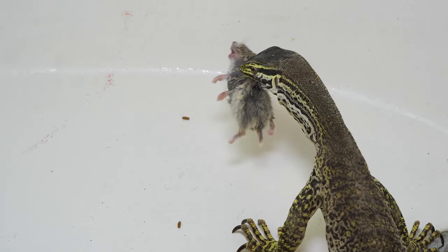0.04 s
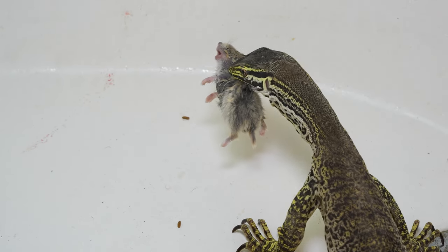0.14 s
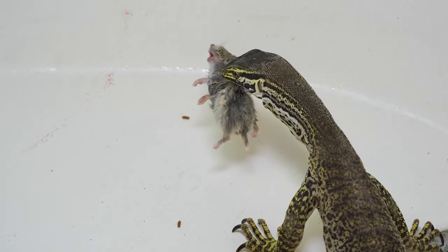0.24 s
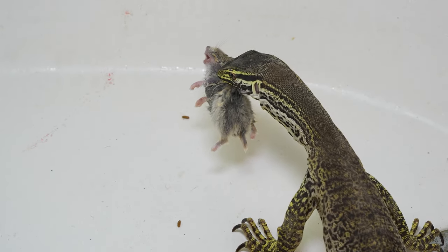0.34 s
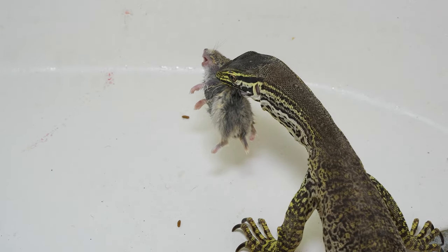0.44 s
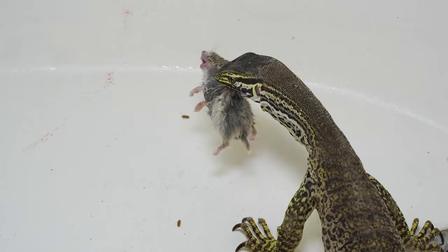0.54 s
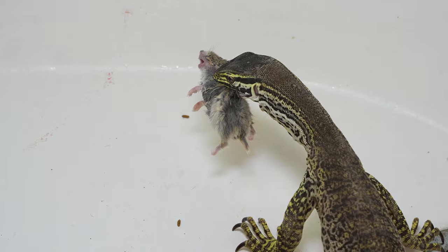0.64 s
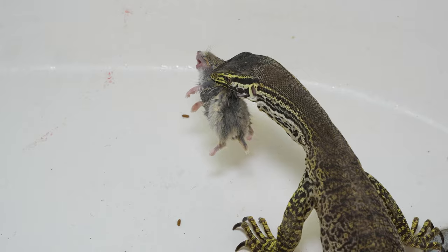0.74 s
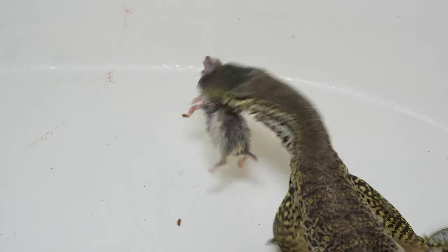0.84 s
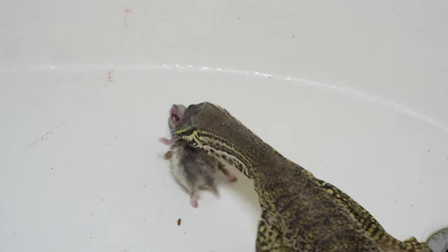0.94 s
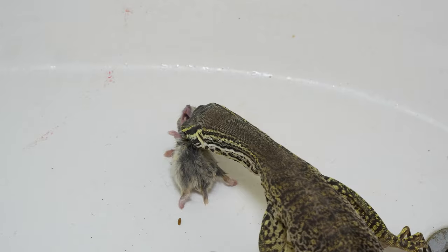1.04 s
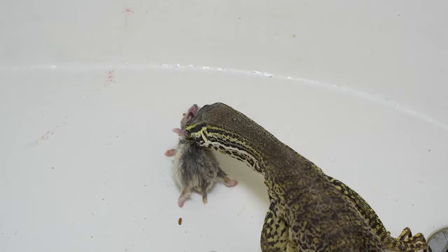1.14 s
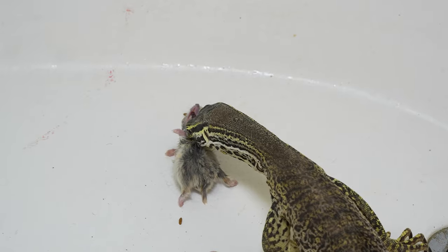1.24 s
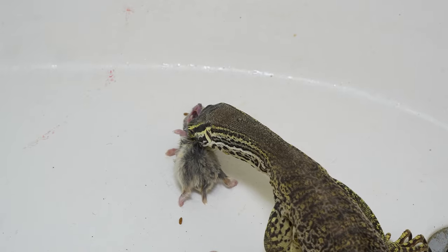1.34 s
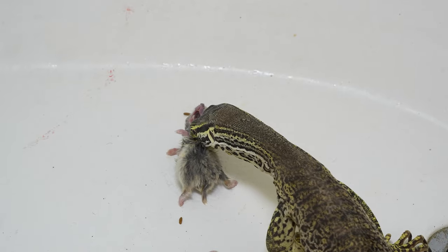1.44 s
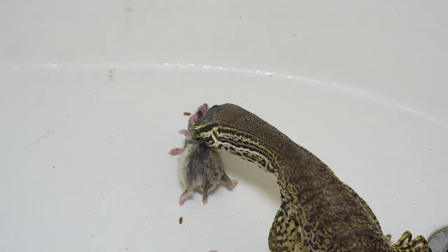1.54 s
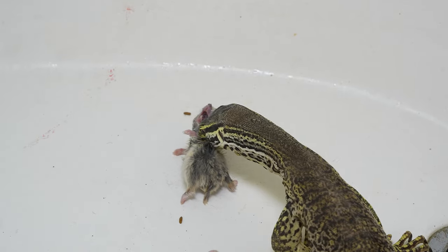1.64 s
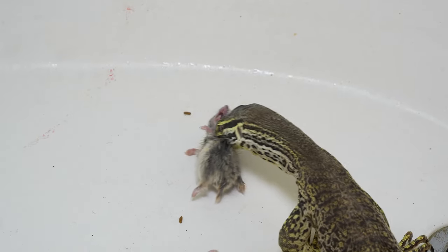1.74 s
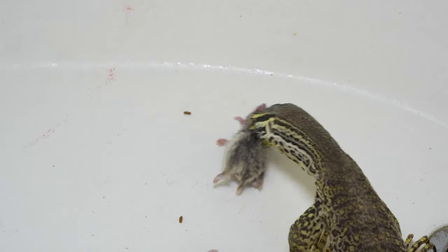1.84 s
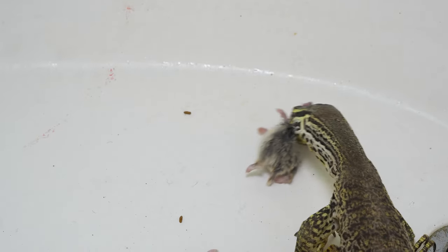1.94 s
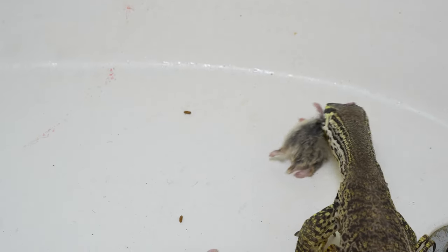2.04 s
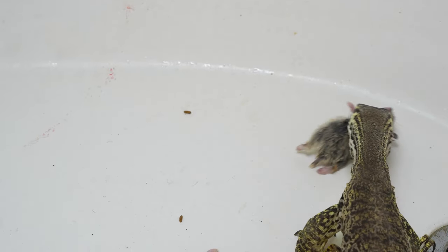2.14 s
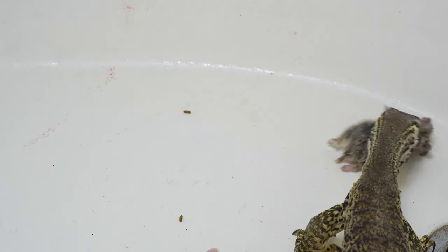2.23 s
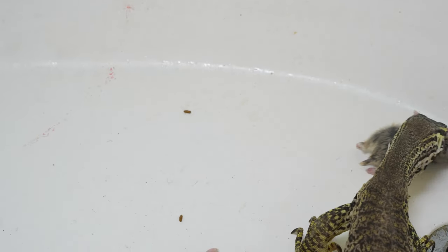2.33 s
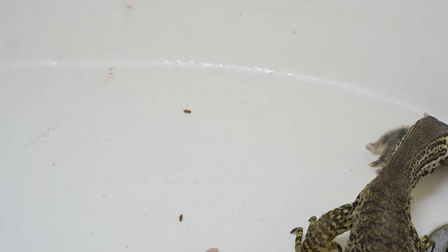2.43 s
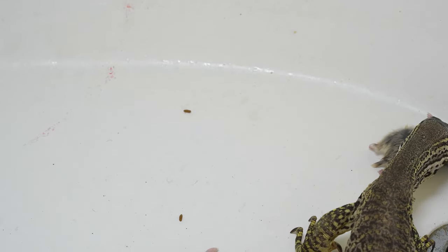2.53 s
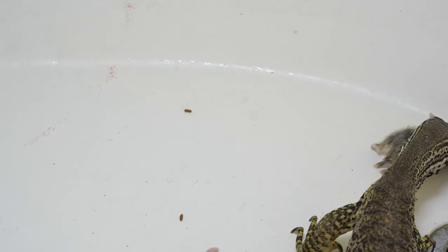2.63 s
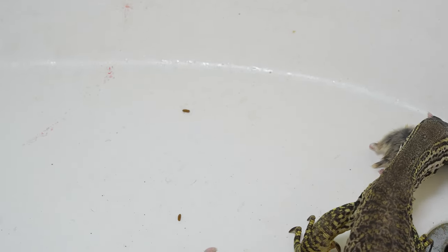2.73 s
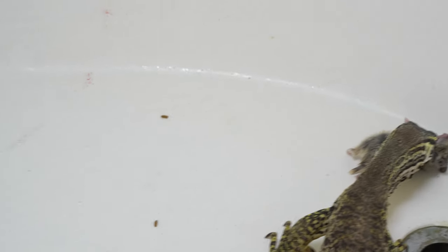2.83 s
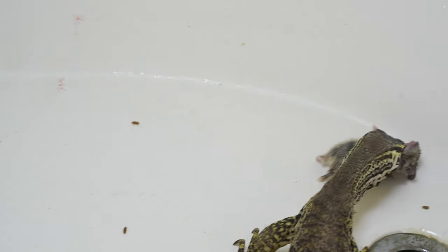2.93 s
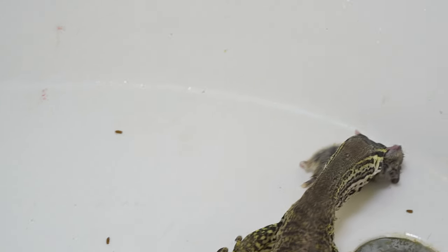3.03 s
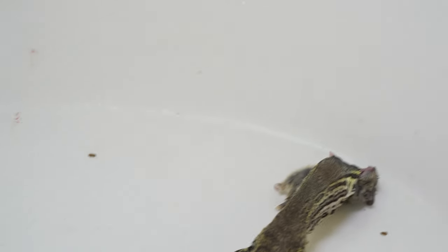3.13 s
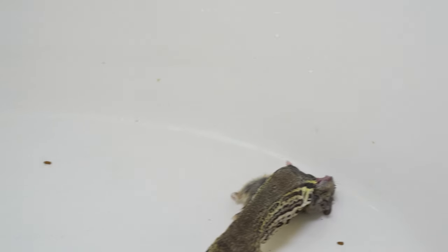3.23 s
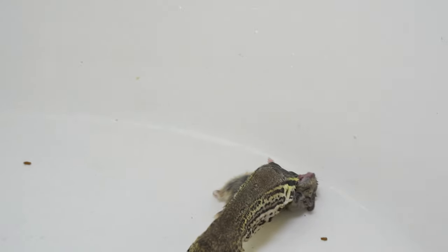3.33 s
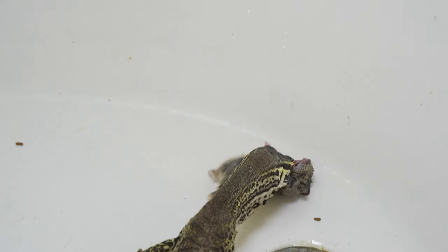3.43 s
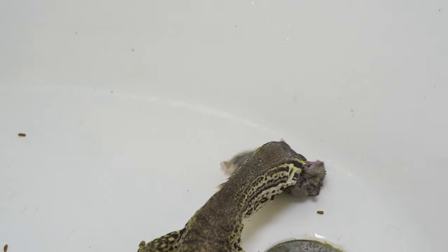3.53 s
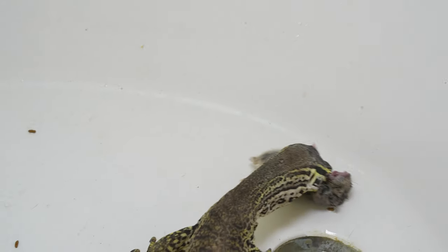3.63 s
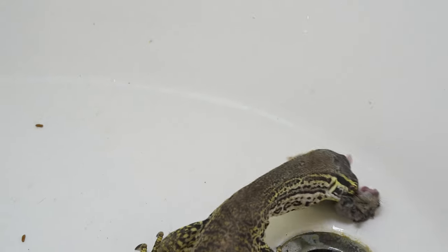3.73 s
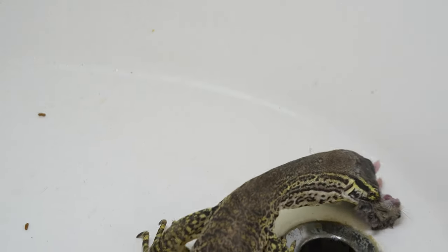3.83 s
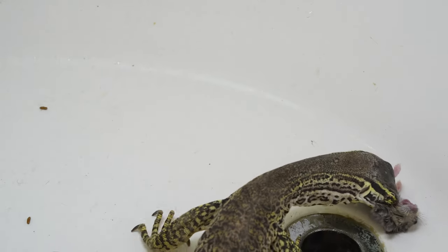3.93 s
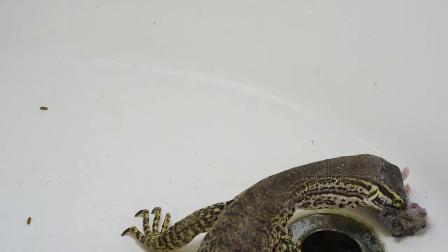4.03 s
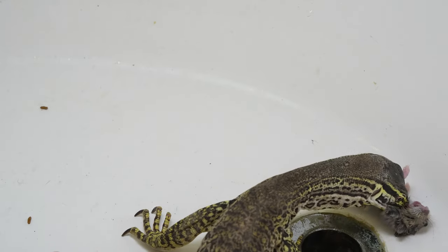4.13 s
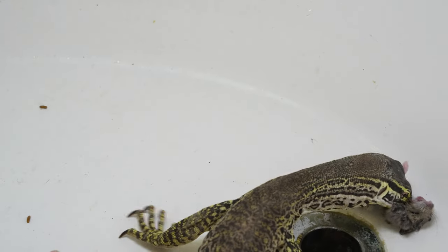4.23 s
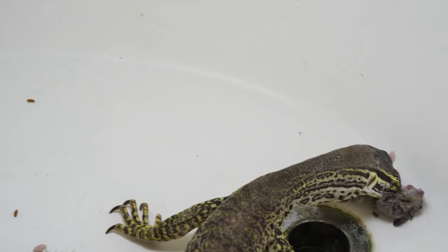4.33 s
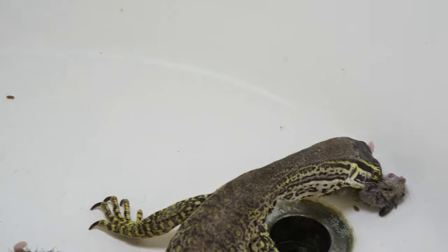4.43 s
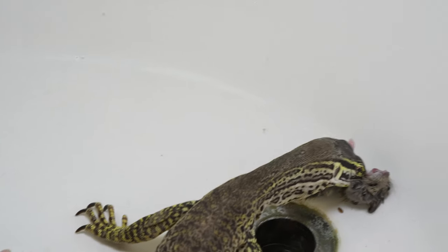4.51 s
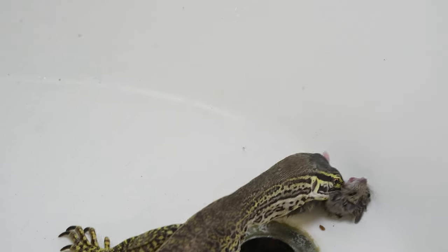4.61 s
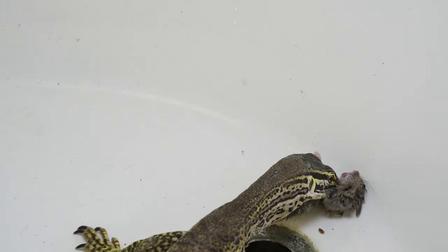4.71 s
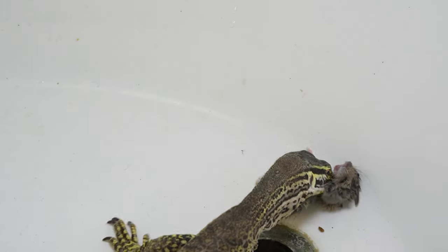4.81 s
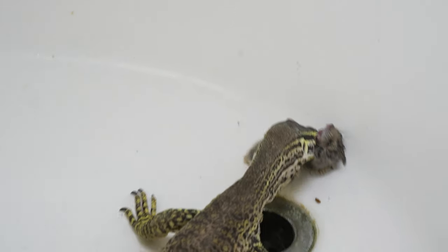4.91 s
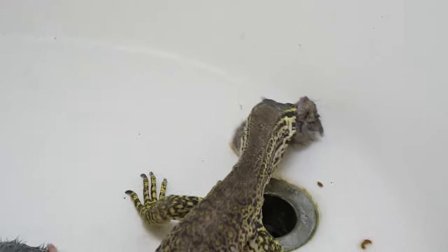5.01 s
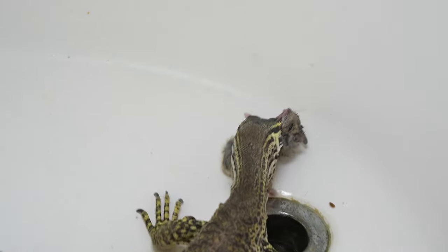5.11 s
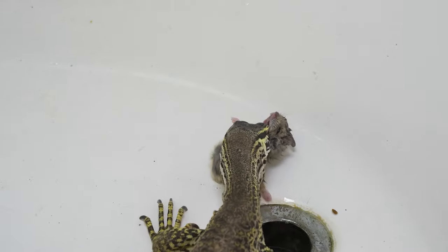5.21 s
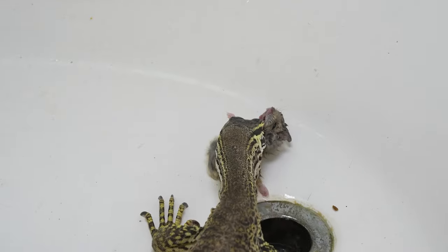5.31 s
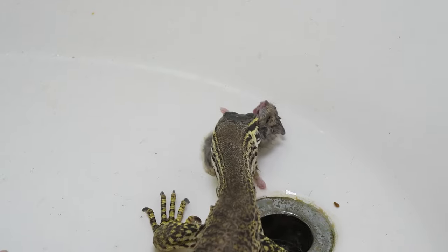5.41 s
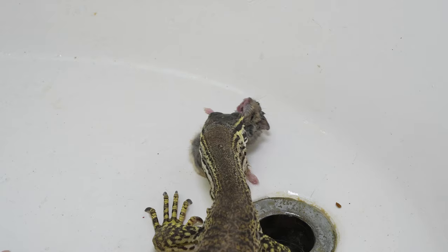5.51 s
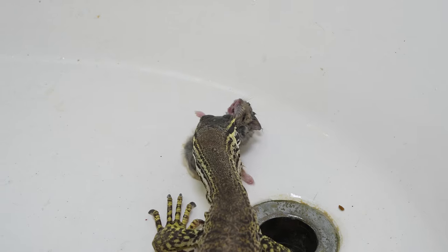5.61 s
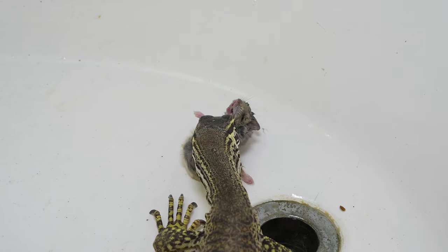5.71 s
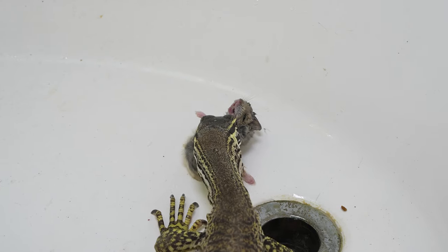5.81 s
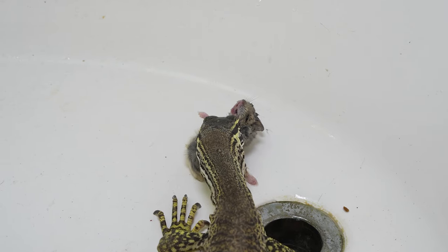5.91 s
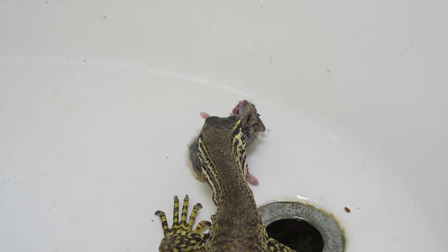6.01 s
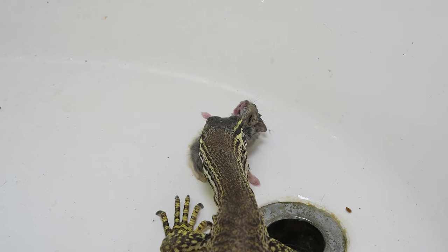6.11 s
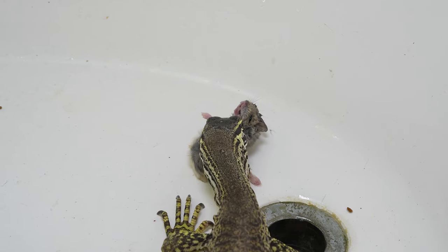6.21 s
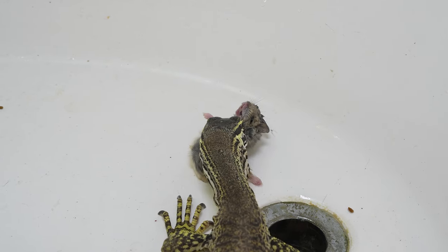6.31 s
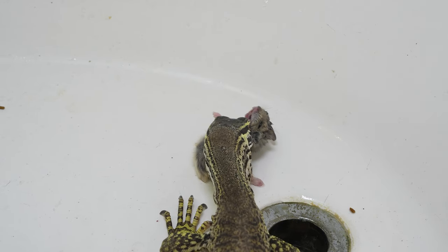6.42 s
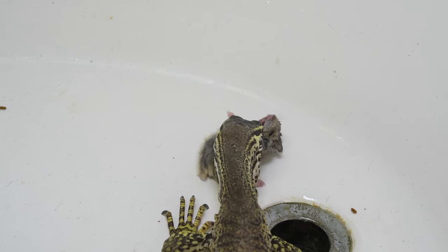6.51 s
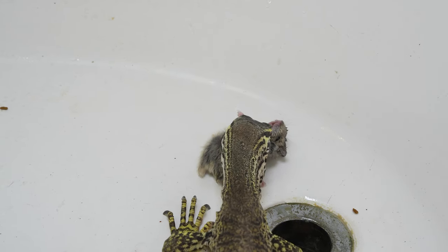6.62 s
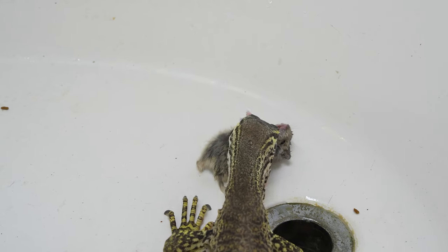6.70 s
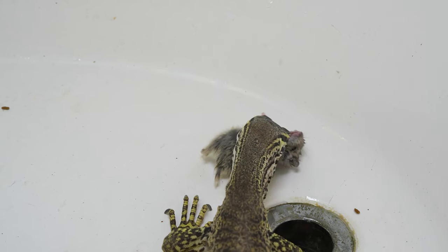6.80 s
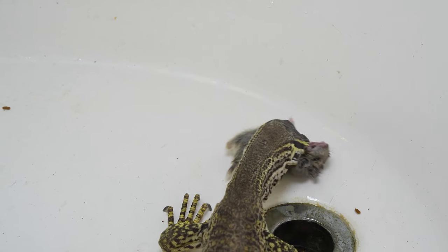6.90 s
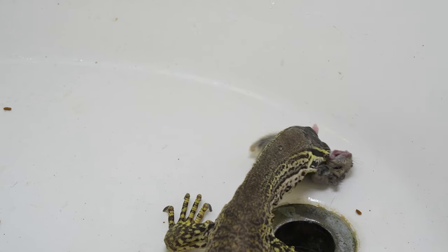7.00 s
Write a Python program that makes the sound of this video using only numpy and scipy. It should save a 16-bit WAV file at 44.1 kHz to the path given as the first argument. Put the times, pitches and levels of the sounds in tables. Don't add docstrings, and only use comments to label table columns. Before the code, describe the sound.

A big lizard's claws tick and scales scrape in an enamel tub, then a heavy booming thump and metallic drain-ring chinks in a small tiled room.

```python
import sys
import numpy as np
from scipy import signal
from scipy.fft import rfft, irfft, next_fast_len
from scipy.io import wavfile
from scipy.ndimage import uniform_filter1d, map_coordinates

SR = 44100
rng = np.random.default_rng(int(sys.argv[2]) if len(sys.argv) > 2 else 0)


def store_pcm(level_fs):
    pcm = np.round(np.clip(level_fs, -1, 1) * 32767).astype(np.int16)
    wavfile.write(sys.argv[1], SR, np.atleast_2d(pcm).T)


def volts_from_decibels(level):
    exponent = np.asarray(level, float) / 20
    return 10 ** exponent


N = 311065


def unit(x):
    return x / np.sqrt(np.mean(x ** 2) + 1e-20)


def along(points, hz):
    f, v = np.transpose(points)
    return np.interp(np.log(hz + 1), np.log(f + 1), v)


def filtered(x, response):
    m = next_fast_len(len(x) + 4096)
    return irfft(rfft(x, m) * response(np.fft.rfftfreq(m, 1 / SR)), m)[:len(x)]


def resonant(x, peaks):
    def response(f):
        total = 0
        for k, (centre, width, db) in enumerate(peaks):
            damping = 1j * f * width
            total = total + (-1) ** k * volts_from_decibels(db) * damping / (centre * centre - f * f + damping)
        return total
    return filtered(x, response)


def coloured(x, spectrum):
    return unit(filtered(x, lambda hz: volts_from_decibels(along(spectrum, hz))))


def wobble(rate):
    knots = rng.standard_normal(int(N * rate / SR) + 4)
    return map_coordinates(knots, [np.arange(N) * rate / SR])


def add(out, s, x):
    part = out[round(s * SR):][:len(x)]
    part += x[:len(part)]


def strike(size):
    return 1. * (np.arange(size) == 0)


def sine(hz, t):
    return np.sin(2 * np.pi * hz * t)


def grit(spread_db):
    return rng.standard_normal(N) * volts_from_decibels(spread_db * wobble(600) + .9 * wobble(40))


def strokes(rows, fade):
    s, rise, hold, db = np.transpose(rows)[..., None]
    grid = np.arange(0, N / SR + .001, .001)
    build_db = 30 * np.minimum(grid - s, 0) / abs(rise)
    fade_db = fade * np.maximum(grid - s - abs(hold), 0)
    gain = volts_from_decibels(db + build_db - fade_db)
    return np.interp(np.arange(N) / SR, grid, gain.sum(axis=0))


# (frequency [Hz], t60 [s])
TILE_DECAY = [(200, 0.59), (1500, 0.58), (5000, 0.53), (10000, 0.43), (13000, 0.31), (16000, 0.44)]


def roomy(x, wet_db, rattle_db=-60, t60=.01):
    hz, t, z = signal.stft(rng.standard_normal(SR // 2), SR, nperseg=256)
    decay = volts_from_decibels(-60 * t / along(TILE_DECAY, hz)[:, None])
    tail = signal.istft(z * decay, SR, nperseg=256)[1]
    t = np.arange(len(tail)) / SR
    tail *= 1 - np.exp(-t / 0.00029)
    echoes = volts_from_decibels(rattle_db - 60 * t / t60) * rng.standard_normal(len(t))
    echoes[0] = 1
    return signal.fftconvolve(x, echoes + volts_from_decibels(wet_db) * tail / np.linalg.norm(tail))


# (frequency [Hz], density [dB per Hz])
TONE_SPECTRUM = [(12, -64), (20, -6.5), (65, -6), (116, -5.5), (150, -4.5), (319, -4.5), (446, -9),
                 (485, -5), (527, -10), (698, -12), (1530, -20), (1710, -19.5), (2320, -21.5), (16000, -30)]


def room_tone():
    return volts_from_decibels(-67 + .3 * wobble(3)) * coloured(rng.standard_normal(N), TONE_SPECTRUM)


# (time [s], peak level [dB], pitch [Hz])
NIPS = [(0.0262, -64, 4600), (0.046, -58, 1150), (.0466, -60, 4300), (.0495, -61, 3000), (.027, -67, 6200),
        (0.0314, -66, 3100), (0.8003, -59, 3800), (1.634, -66, 4180), (1.6345, -61, 6800),
        (1.7402, -63, 8100), (1.9413, -47, 7860), (4.2298, -44, 4300), (4.236, -47, 4000),
        (4.8255, -50, 3950), (4.9025, -41, 4400), (1.0445, -41.5, 5030), (2.247, -65, 990),
        (4.572, -41, 4900), (4.587, -42, 3600), (4.601, -42, 4700), (4.616, -41, 3300), (4.893, -49, 3700),
        (4.9009, -43, 2520), (5.7905, -61.5, 3750), (5.8444, -67, 3700), (5.9444, -69, 3770),
        (5.9994, -67.5, 3600), (6.359, -62.5, 3740), (6.444, -66, 3900), (6.4748, -62, 3700),
        (6.7152, -52.5, 4100), (6.816, -59.5, 3300)]


def nips():
    out = np.zeros(N)
    for s, db, hz in NIPS:
        band = [(hz, .26 * hz, 0)]
        tick = resonant(resonant(strike(size=1024), band), band)
        tick = volts_from_decibels(db + 1.5) * tick / np.abs(tick).max()
        add(out, s, roomy(tick, wet_db=-4, rattle_db=-24, t60=.012))
    return out


# (full force [s], rise [s], hold [s], level [dB], sharp edge re scrape [dB])
SKIDS = [(0.035, 0.1, .01, -77, -16), (0.84, 0.014, .01, -58, -13), (0.844, 0.035, 0.012, -52, 0),
         (0.924, 0.0048, 0.018, -56, -0.5), (0.97, 0.11, 0.028, -57, -21), (1.74, 0.6, 0.25, -74, -4.5),
         (2.093, .05, 0.016, -83, 3), (2.196, 0.22, 0.14, -81.5, 0.5), (4.246, 0.029, .005, -48.5, -42),
         (4.823, 0.29, 0.057, -61, -8), (4.908, 0.047, .01, -51.5, -22), (6.822, 0.33, 0.063, -77.5, -1.5)]
# (full force [s], rise [s], hold [s], level [dB], sharp edge re scrape [dB])
SLIDES = [(2.772, 0.065, 0.0094, -61.5, -25.5), (2.96, 0.15, 0.16, -77, -11), (3.2, 0.83, 0.21, -69, -6.5),
          (3.52, 0.17, 0.051, -77, -16), (4.39, 0.27, 0.087, -65.5, -13), (4.6, 0.17, 0.018, -54, -28),
          (4.98, 0.061, 0.016, -57, -22), (5.14, 0.52, 0.096, -70, -11), (5.4, 0.23, 0.26, -73.5, -9.5),
          (5.786, 0.037, .005, -80, -17), (6.5, 0.56, .2, -82.5, -14), (6.95, 0.22, 0.089, -83.5, 3)]
# (full force [s], rise [s], hold [s], level [dB], sharp edge re scrape [dB])
CROSSINGS = [
    (3.68, 0.066, 0.0038, -63, -21),
    (3.73, 0.04, .04, -80, -43),
    (4.573, 0.075, 0.027, -51, -12.5),
]
PIPE_SHARES = (-55, -22, -7)
# (full load [s], rise [s], hold [s], shell level [dB], deep sway level [dB])
LEANS = [(0.045, 0.024, 0.0077, -66, -85), (0.142, .02, .005, -73, -75), (0.826, 0.04, 0.017, -60, -74),
         (0.874, 0.1, 0.031, -49.5, -62), (0.923, 0.004, 0.012, -47.5, -50.5),
         (1.0, 0.082, 0.065, -62, -75), (1.723, 0.055, 0.071, -67, -75), (1.896, 0.077, 0.012, -55, -65),
         (2.254, 0.03, 0.0089, -65.5, -89), (2.63, 0.35, .02, -80, -66), (2.778, 0.13, 0.0045, -60.5, -56),
         (3.1, 0.083, .01, -87, -64), (3.35, 0.37, 0.029, -82, -71.5), (3.487, 0.27, 0.1, -65.5, -91.5),
         (3.704, 0.16, 0.072, -59.5, -73), (3.996, 0.12, 0.056, -57, -70),
         (4.249, 0.036, 0.0069, -51.5, -52), (4.342, 0.14, 0.13, -63.5, -56),
         (4.548, 0.075, 0.033, -77, -55), (4.6, 0.13, 0.016, -44, -38), (4.9, 0.14, 0.11, -57.5, -47),
         (5.1, 0.41, 0.14, -67, -67.5), (5.39, 0.13, 0.11, -68.5, -72.5), (4.66, .05, 0.0093, -57.5, -62),
         (5.821, 0.23, 0.065, -65.5, -75), (6.886, 0.55, 0.069, -68, -75)]
# (centre [Hz], width [Hz], level [dB])
PIPE = [(1655, 550, 3.5), (2530, 45, -1), (3000, 790, 0.5), (3950, 550, 0), (4800, 1100, -3.5)]
# (frequency [Hz], density [dB per Hz])
SCRAPE_SPECTRUM = [(530, -18), (900, 3.5), (1130, 1.5), (1840, 2), (3970, 4), (4810, 1.5), (8330, -19.5),
                   (9000, -33), (11700, -72), (19800, -120)]
# (frequency [Hz], density [dB per Hz])
EDGE_SPECTRUM = [(4000, -14.5), (7000, -1), (10500, -5.5), (13000, -15), (16000, -21)]
# (frequency [Hz], density [dB per Hz])
SHELL_SPECTRUM = [(76, -45), (130, -11), (151, -5), (190, -5.5), (286, -3.5), (376, -0.5), (404, 1),
                  (531, -8), (596, -1), (662, -10), (1600, -17), (2080, -32), (3520, -120)]
# (frequency [Hz], density [dB per Hz])
SWAY_SPECTRUM = [(18, -34), (30, -2.5), (81, 2.5), (129, 0), (155, -20), (177, 0), (191, -0.5),
                 (230, -11.5), (300, -44), (510, -120)]


def dragging():
    force = grit(spread_db=1.5)
    scrape, edge = coloured(force, SCRAPE_SPECTRUM), coloured(force, EDGE_SPECTRUM)
    piped = unit(resonant(resonant(force, PIPE), PIPE))
    shell = coloured(grit(spread_db=2.5), SHELL_SPECTRUM)
    sway = coloured(grit(spread_db=2.5), SWAY_SPECTRUM)
    out = strokes([row[:4] for row in LEANS], fade=184) * shell
    out += strokes([(*row[:3], row[4]) for row in LEANS], fade=184) * sway
    for rows, pipe_db in zip((SKIDS, SLIDES, CROSSINGS), PIPE_SHARES):
        out += strokes([row[:4] for row in rows], fade=167) * (scrape + volts_from_decibels(pipe_db) * piped)
        out += strokes([(*row[:3], row[3] + row[4]) for row in rows], fade=150) * edge
    return out


# (time [s], peak level [dB], pitch [Hz], t60 [s])
KNOCKS = [(0.045, -61, 461, 0.13), (0.127, -66, 515, 0.055), (1.748, -59, 436, 0.053),
          (1.881, -53.5, 619, 0.21), (2.247, -51, 451, 0.057), (3.098, -52.5, 205, 0.066),
          (2.775, -52, 187, 0.095), (3.329, -68, 294, 0.041), (3.949, -52, 274, 0.045),
          (3.999, -51.5, 537, 0.1), (4.015, -55, 500, 0.09), (4.058, -59, 531, 0.13),
          (5.799, -61, 532, 0.054), (5.845, -71, 366, 0.053)]
# (time [s], peak level [dB], pitch [Hz], t60 [s])
MORE_KNOCKS = [(2.8, -56, 283, 0.099), (3.8, -53, 420, 0.07), (0.043, -64, 55, 0.089), (.055, -57, 610, 0.044),
               (.137, -59, 480, 0.036), (4.252, -47, 950, 0.05), (4.262, -56, 1900, .03),
               (4.292, -48.5, 540, 0.037), (4.9, -47, 940, 0.048), (5.5, -59, 270, 0.064), (4.548, -46, 105, .1),
               (4.61, -43, 147, 0.093), (4.632, -45, 109, 0.11), (4.664, -45, 139, .1), (4.6, -45, 390, .08),
               (4.955, -46.5, 96, 0.14), (4.926, -48, 129, 0.125), (4.988, -47, 150, 0.086),
               (0.051, -63, 1200, .03), (4.585, -56, 275, 0.086), (4.605, -54, 73, 0.2), (4.53, -49, 82, 0.13),
               (4.59, -51, 213, 0.11), (4.909, -43.5, 202, 0.11), (4.969, -49, 169, 0.12)]


def knocks():
    out, t = np.zeros(N), np.arange(SR // 4) / SR
    for s, db, hz, t60 in KNOCKS + MORE_KNOCKS:
        panel = sine(hz, t) + 0.34 * volts_from_decibels(-60 * t / t60) * sine(2.4 * hz, t)
        unevenness = uniform_filter1d(rng.standard_normal(len(t)), size=200) * np.sqrt(200)
        panel *= volts_from_decibels(3 * unevenness)
        add(out, s, panel * volts_from_decibels(db - 60 * t / t60) * (1 - np.exp(-t / 0.0031)))
    return roomy(1.8 * out, wet_db=-13, rattle_db=-22, t60=.03)[:N]


# (time [s], peak level [dB], pitch [Hz], dull part [dB], bright part [dB])
TICKS = [(0.0462, -50, 1800, 3.5, -18.5), (0.129, -57.5, 1600, 4.5, -20), (.8268, -43, 5100, -6, -20),
         (0.833, -44, 4650, -6, -18), (0.8395, -37, 5200, 2.5, -14), (0.8482, -29, 6850, -2.5, -12),
         (0.8656, -29, 4300, -4, -8), (0.8705, -37, 5260, -2, -16), (0.9224, -22.5, 4800, -1, -5),
         (0.9274, -37, 4600, 2, -19), (0.968, -31.5, 4350, -6, -8), (1.0426, -39.5, 5300, -9, -9),
         (1.8823, -47, 5700, 9.5, -15), (2.243, -52.5, 5500, 2, -12), (2.7663, -47, 2330, -5, -33),
         (3.4643, -39.5, 5960, -0.5, -11), (3.482, -42.5, 4900, -3, -15), (3.673, -37, 5130, -4, 17.5),
         (3.9983, -32, 4130, 0.5, -14), (4.229, -42, 2600, -3, -33.5), (4.5382, -41, 3900, -15, -22),
         (4.5654, -46, 4800, -3, -21), (4.9012, -40, 4000, 1, -32), (5.8444, -66, 1800, 5, -16),
         (6.715, -54.5, 4900, -11, -21)]


def claws():
    out = np.zeros(N)
    bounce_s = .00066
    for s, db, hz, dull_db, bright_db in TICKS:
        wide = np.clip(0.6 - 0.06 * dull_db, .3, 1)
        pitched = resonant(strike(size=1024), [(hz, wide * hz, 0)])
        dull = resonant(strike(size=1024), [(634, 570, dull_db + 6.0)])
        bright = resonant(strike(size=1024), [(11100, 5300, bright_db - 30.0)])
        click = (pitched - (dull + bright)) / np.abs(pitched).max()
        click = click + 0.05 * np.roll(click, round(bounce_s * SR))
        tip = resonant(strike(size=256), [(11500, 7700, 0)])
        add(out, s, volts_from_decibels(db + bright_db - 11.0) * tip)
        add(out, s, roomy(volts_from_decibels(db - 5) * click, wet_db=6.0, rattle_db=-13, t60=0.03))
    return out


# (full force [s], rise [s], hold [s], level [dB])
RASPS = [
    [(4.722, 0.024, .005, -57), (4.81, 0.09, 0.038, -53.5)],
    [(4.9, 0.023, 0.0046, -44.5), (4.976, 0.26, 0.0054, -52)],
    [(.852, 0.038, 0.019, -42), (6.83, .3, 0.11, -71)],
    [(3.692, .045, 0.07, -61.5), (4.567, 0.035, 0.085, -55)],
]
# (centre [Hz], width [Hz], level [dB])
RASPED = [
    [(5620, 260, 7.5), (6400, 1500, -6), (7200, 600, 0.5), (8240, 500, -21), (10100, 400, -12)],
    [(2180, 110, -1), (2630, 100, 3.5), (3600, 300, 0), (4000, 370, 2), (5200, 660, -4.5)],
    [(4100, 1200, 2), (6560, 2000, -2)],
    [(374, 23, 2), (1430, 150, 8), (1670, 160, 6), (1730, 37, 8), (3290, 180, -11), (4900, 200, -13)],
]


def rasping():
    out = np.zeros(N)
    for rows, peaks in zip(RASPS, RASPED):
        out += volts_from_decibels(-3.0) * strokes(rows, fade=280) * unit(resonant(grit(spread_db=3.5), peaks))
    return out


# (full force [s], rise [s], hold [s], level [dB])
GRIPS = [
    (1.46, .3, .17, -86),
    (2.666, 0.26, 0.084, -65),
    (3.0, 0.25, 0.22, -65),
    (3.65, 1, 0.48, -70),
]
# (frequency [Hz], density [dB per Hz])
GRIP_SPECTRUM = [(15, -25), (28, -9), (42, -9), (60, -42), (100, -82)]


def handling():
    return strokes(GRIPS, fade=100) * coloured(rng.standard_normal(N), GRIP_SPECTRUM)


# (time [s], peak level [dB], second clack re first [dB])
SNAP = (1.8849, -26.5, -6.5)
# (centre [Hz], width [Hz], level [dB])
CLACK = [(654, 860, -8), (1800, 1500, -7), (3460, 1300, -2.5), (5500, 1700, -1.5), (7200, 2400, -4),
         (11000, 5700, -15)]


def snap():
    s, db, second_db = SNAP
    gap_s = .00154
    click = resonant(strike(size=1024), CLACK)
    click = click + volts_from_decibels(second_db) * np.roll(click, round(gap_s * SR))
    click = volts_from_decibels(db) * click / np.abs(click).max()
    out = np.zeros(N)
    add(out, s, roomy(click, wet_db=3.0, rattle_db=-13.5, t60=0.037))
    return out


# (time [s], boom level [dB], slap level [dB])
BLOWS = [
    (3.7912, -31, -4.5),
    (3.7982, -25, -7.5),
    (3.8054, -18.5, -16),
]
# (frequency [Hz], level [dB], t60 [s])
LOW_PANELS = [(60, -3.5, 0.29), (97, 1, 0.16), (112.6, -1.5, 0.29), (159, -11, 0.26), (192.7, -10.5, 0.26),
              (254, -12.5, 0.23), (336, -9, 0.11), (375, -13.5, 0.3), (420, -19.5, 0.21)]
# (centre [Hz], width [Hz], level [dB])
UPPER_SHELL = [(360, 150, 4), (638, 63, 3.5), (717, 46, 2.5), (952, 74, -0.5), (1240, 170, -5)]
# (frequency [Hz], level [dB], t60 [s])
STIFF_PANELS = [(438, -18, .17), (584, -17, 0.14), (691, -14, 0.3), (950, -11, 0.38), (2370, -27, 0.25),
                (1560, -16, 0.25), (1696, -9, 0.183), (1740, -21, .3), (1860, -17, 0.24), (3060, -18, 0.26),
                (3180, -14, 0.35), (3300, -14, 0.22), (3900, -13.5, 0.214), (4870, -30, .3)]


def fall():
    out, t = np.zeros(N), np.arange(SR // 2) / SR
    boom = sum(volts_from_decibels(level - 60 * t / t60) * sine(hz, t) for hz, level, t60 in LOW_PANELS)
    boom *= 1 - np.exp(-t / 0.0018)
    boom = filtered(boom, lambda hz: (1j * hz / (30 + 1j * hz)) ** 2)
    flesh = filtered(strike(size=len(t)), lambda hz: 1 / (1 + 1j * hz / 6500) ** 4)
    hard = volts_from_decibels(8.5) * resonant(flesh, UPPER_SHELL)
    hard += volts_from_decibels(1.5) * resonant(resonant(flesh, PIPE), PIPE)
    hard += volts_from_decibels(-13) * flesh
    hard += volts_from_decibels(-9) * resonant(flesh, [(4350, 500, 0), (2500, 500, -3)])
    for k, (s, boom_db, slap_db) in enumerate(BLOWS):
        chime = sum(volts_from_decibels(level + rng.normal(0, 1.2) - 60 * t / t60) * sine(hz, t)
                    for hz, level, t60 in STIFF_PANELS)
        add(out, s, volts_from_decibels(slap_db - 27.5) * chime * (1 - np.exp(-t / 0.00044)))
        swing = (-1) ** k
        add(out, s, swing * volts_from_decibels(boom_db) * roomy(boom, wet_db=-19))
        add(out, s, volts_from_decibels(slap_db) * roomy(hard, wet_db=3.5, rattle_db=-13.5, t60=0.027))
    return out


# (time [s], peak level [dB], brightness [dB])
TAPS = [(3.926, -36.5, -6), (3.935, -42, 0), (3.947, -32, -4.5), (3.9537, -34, -3), (3.975, -37, -18),
        (3.998, -21, -23), (4.0126, -27, 4), (4.244, -29.5, -12), (4.25, -25, -8), (4.254, -29.5, -5),
        (4.2595, -28, 0), (4.7162, -39, -24), (4.7665, -30.5, -19), (4.779, -33, -18), (4.805, -31, -20),
        (4.826, -34, -20)]
# (frequency [Hz], level [dB], t60 [s])
RING_MODES = [(4860, -23, 0.0028), (5630, 2.5, 0.01), (5640, -35, 0.36), (5600, -28, .2),
              (6530, -6, 0.0071), (6000, -13, .005), (6200, 5, 0.0032), (6920, -1.5, 0.0045),
              (7260, -1.5, 0.006), (7930, -9.5, 0.0092), (8210, -7, 0.0063), (7600, -12, .008),
              (10000, -15.5, 0.0062), (12250, -23, 0.0053)]


def drain_ring():
    out, t = np.zeros(N), np.arange(SR // 8) / SR
    band = [(6150, 5700, 0.0041)]
    scratch = resonant(resonant(resonant(strike(size=len(t)), band), band), band)
    for s, db, bright_db in TAPS:
        ring = np.zeros(len(t))
        for hz, level, t60 in RING_MODES:
            tilt_db = (bright_db + 9.5) * (hz > 6800)
            seated_db = level + tilt_db + rng.normal(0, 3)
            ring += volts_from_decibels(seated_db - 60 * t / t60) * sine(hz * rng.normal(1, .006), t)
        ring *= 1 - np.exp(-t / 0.0012)
        chink = volts_from_decibels(db - 14.5) * (ring + volts_from_decibels(bright_db / 2 + 20.0) * scratch)
        add(out, s, roomy(chink, wet_db=2.5, rattle_db=-10.0, t60=0.027))
    return out


def scene():
    contacts = nips() + knocks() + claws() + snap() + fall() + drain_ring()
    return (room_tone() + dragging() + rasping() + handling() + contacts)[None]


def top_cut(x):
    return signal.sosfilt(signal.butter(12, 16510, fs=SR, output="sos"), x)


def record(dry):
    def mic(hz):
        return 1j * hz / (25 + 1j * hz) * np.where(hz < 15830, 1, .1)
    mix = filtered(dry[0], mic)[None]
    return top_cut(mix)


dry = scene()
out = record(dry)
store_pcm(out)
```